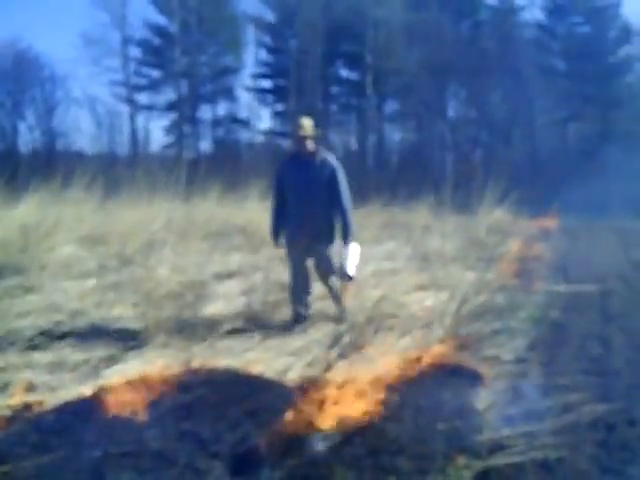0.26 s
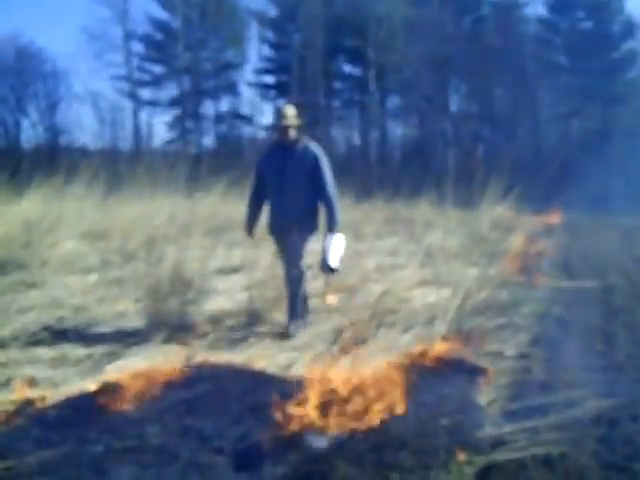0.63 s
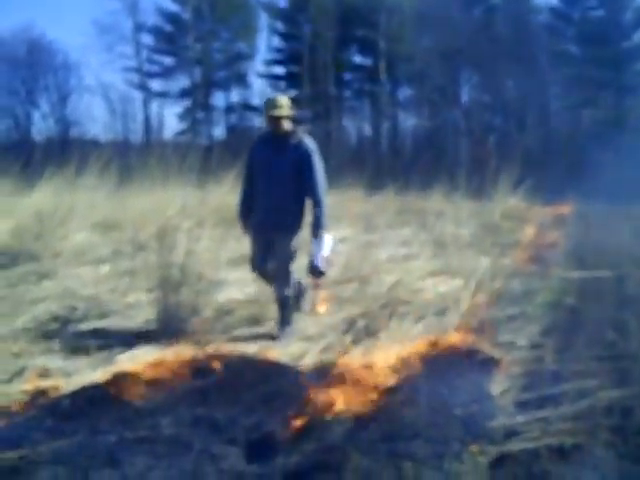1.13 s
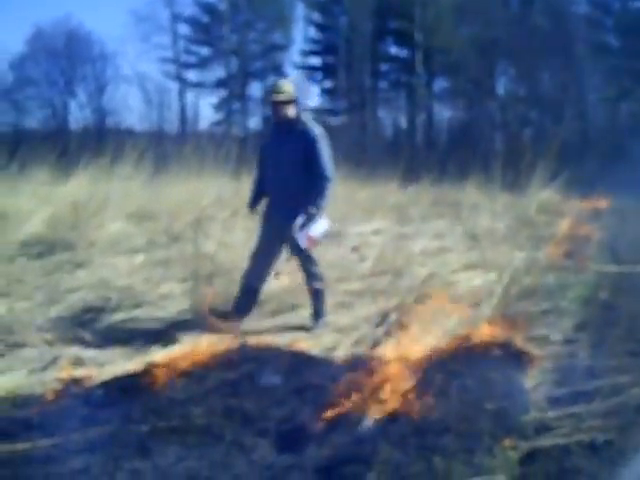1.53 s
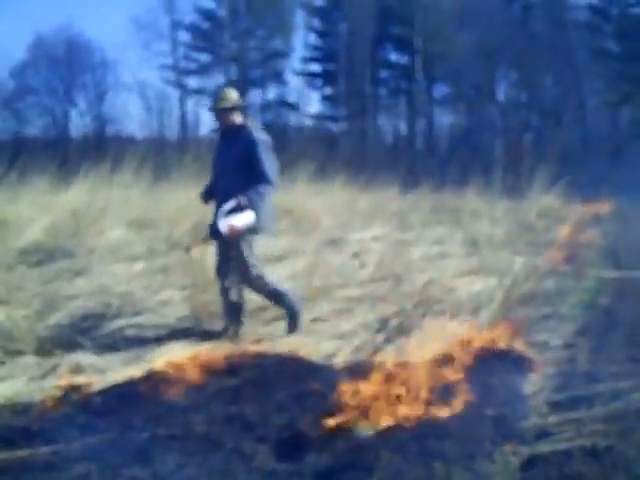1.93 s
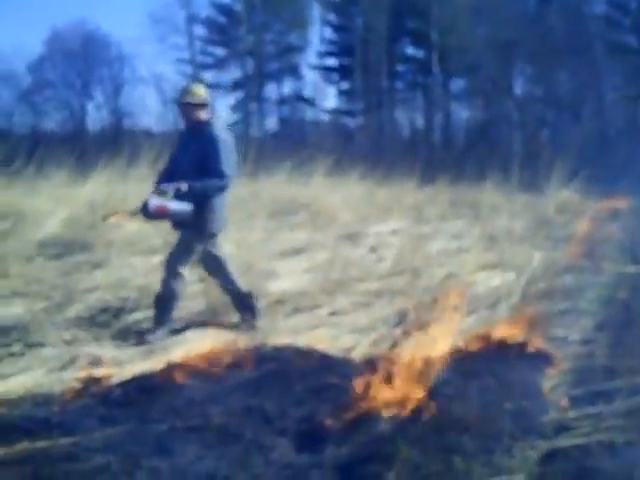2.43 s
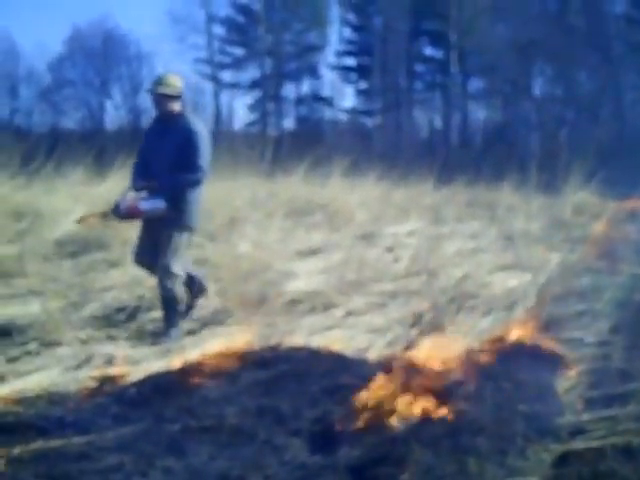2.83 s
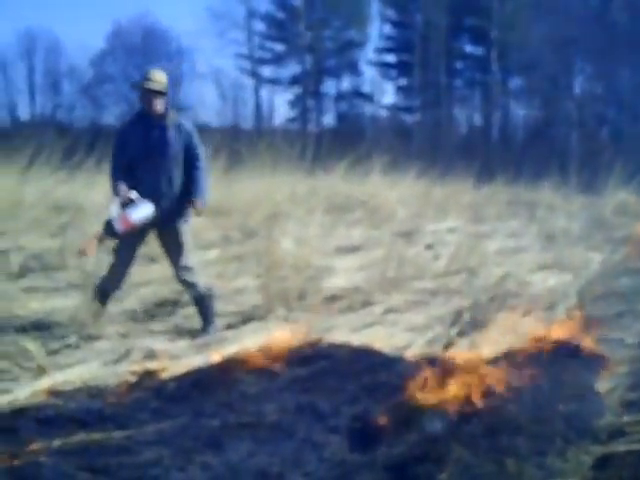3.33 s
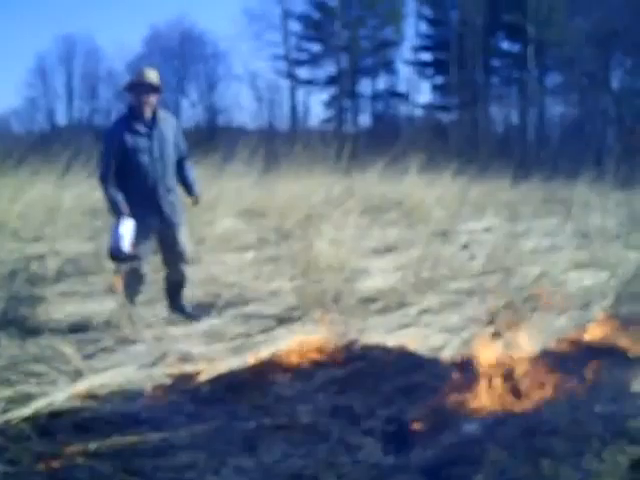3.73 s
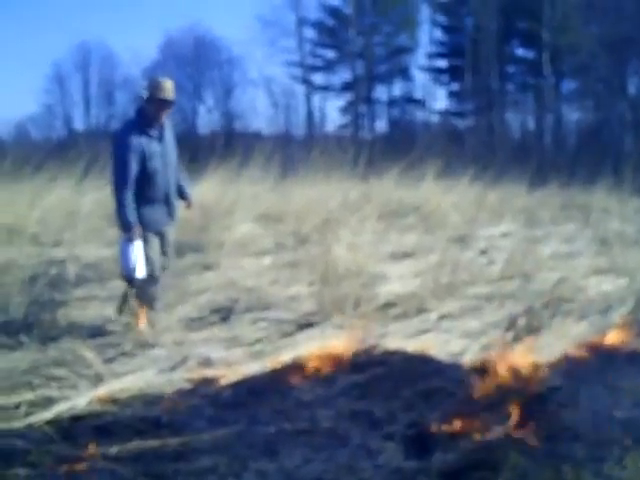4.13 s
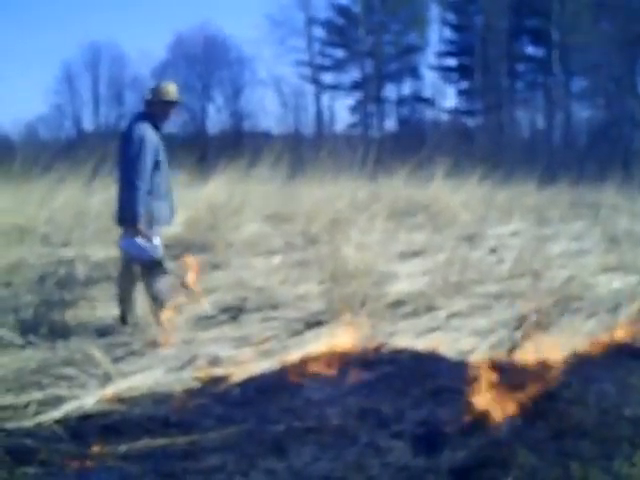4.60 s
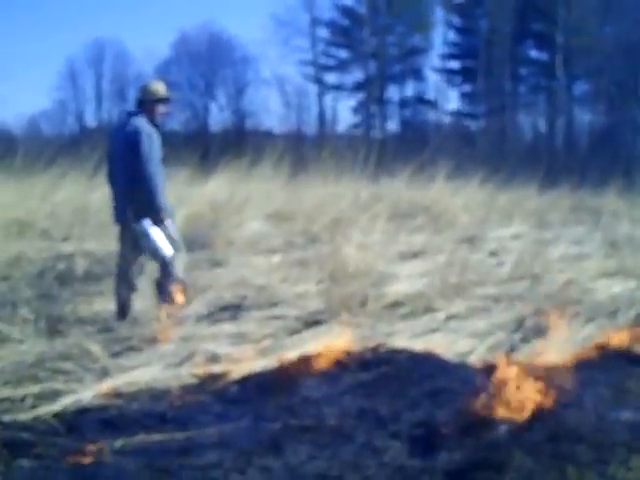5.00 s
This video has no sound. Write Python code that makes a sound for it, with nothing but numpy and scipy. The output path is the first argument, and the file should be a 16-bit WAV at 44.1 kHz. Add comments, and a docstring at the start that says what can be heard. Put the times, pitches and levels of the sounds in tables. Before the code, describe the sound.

Outdoors in an open field, dry grass burns a few steps from a small mono microphone. From 0 to 1 s there are scattered crisp snaps, one stronger near 0.4 s, over faint fizz, a soft flame rush and low breeze rumble. A tight cluster of crackles comes around 1 s. From about 1.2 to 3 s gusts buffet the microphone with deep rumble, fluttering and short dull thumps, strongest around 1.6-2.3 s; a brighter sizzle flares at about 1.7-2 s, and pops continue irregularly. After 3 s the wind drops and the crackling becomes much denser, with bright cracks carrying small hollow, woody knocks. Hard bursts land near 3.1, 3.75 and 4.3 s; the loudest, around 4.7 s, is sharp and slightly clipped. The flame rush swells gently near 4.8 s as light wind returns. Strong pops at 5.1, 5.2 and 5.5 s finish it. Only a very short scattered tail follows each snap.

```python
"""Stems of dry field grass burst in a fire a few steps away: snaps, hollow knocks and low puffs from noise showers.
Countless blades fizz as filtered hiss and sparse ticks, and the flames rush as unevenly swelling noise.
A gusty breeze buffets the microphone: slow and quick bands of noise, and single eddies of a few swings.
The microphone colours the sum, its loudest peaks overload at full scale, and the top treble is cut."""
import sys
import numpy as np
from scipy import signal
from scipy.fft import rfft, irfft
from scipy.io import wavfile

SR = 44100
rng = np.random.default_rng(int(sys.argv[2]) if len(sys.argv) > 2 else 0)


def file_out(sig):
    """Save sig as 16-bit WAV at sys.argv[1]."""
    # one column per channel
    cols = np.atleast_2d(sig).T
    # limit, then scale
    lim = np.clip(cols, -1, 1)
    pcm = np.round(lim * 32767).astype(np.int16)
    wavfile.write(sys.argv[1], SR, pcm)


N = 244755  # samples

# All levels stand ahead of the microphone's own colour; spectra are relative.
# Fizz of the burning grass, flaring up now and then, before its colour filter.
# Each row: time in seconds, hiss level in dB, level of the ticks of single blades in dB.
FIZZ_LEVELS = [(0.0, -52.5, -38.5), (0.3, -44.5, -54), (0.45, -59.5, -57.5), (0.8, -50, -53),
               (1.15, -59, -56), (1.55, -54, -50.5), (1.68, -45.5, -55), (1.82, -41, -47), (1.96, -45, -44),
               (2.08, -52, -54), (2.25, -49.5, -46.5), (2.4, -53.5, -54.5), (2.8, -58.5, -52.5),
               (3.2, -58.5, -46), (4.1, -55.5, -53), (4.85, -52.5, -48), (5.55, -59.5, -49.5)]
# Spectrum of the fizz. Each row: frequency in Hz, density in dB per Hz.
FIZZ_SPECTRUM = [(400, -13), (1500, 2), (13000, -2)]
# Rush of the flames. Each row: time in seconds, level in dB.
RUSH_LEVELS = [(0.0, -49.5), (0.33, -58), (0.7, -53.5), (2.0, -55.5), (2.3, -51.5), (4.3, -50), (4.8, -47),
               (5.55, -55)]
# Spectrum of the rush. Each row: frequency in Hz, density in dB per Hz.
RUSH_SPECTRUM = [(250, -27.5), (500, 5), (1050, -3), (1300, -6), (2800, -14), (6000, -44)]
# Slow buffeting of the changing breeze on the microphone, swelling and lulling.
# Each row: time in seconds, level in dB.
BREEZE_LEVELS = [(0.0, -36.5), (0.3, -42), (0.95, -42), (1.2, -31.5), (1.8, -31), (2.03, -29),
                 (2.14, -33.5), (2.25, -30), (2.45, -31.5), (2.6, -34.5), (2.85, -34.5), (3.3, -39.5),
                 (3.8, -37.5), (4.4, -41.5), (4.75, -34.5), (5.4, -33.5), (5.55, -39)]
# Spectrum of the slow eddies. Each row: frequency in Hz, density in dB per Hz.
BUFFET_SPECTRUM = [(10, 1), (25, -0.5), (60, -1), (100, -2), (150, -8.5), (300, -50), (1000, -89)]
# Quick eddies between gusts. Each row: time in seconds, flutter level in dB.
CALM_FLUTTER_LEVELS = [(0.0, -48), (1.1, -49), (3.2, -42), (5.55, -48)]
# Spectrum of the quick eddies. Each row: frequency in Hz, density in dB per Hz.
FLUTTER_SPECTRUM = [(60, -18.5), (120, 2), (200, 3.5), (330, -5.5), (550, -20.5), (900, -27), (4000, -48.5)]
# Bursting stems. Each row: start in seconds, snap level in dB, level of the hollow knock over the snap
# in dB, pitch of the knock in Hz, time scale of the split in ms.
BURSTING_STEMS = [(0.0286, -25.5, -1.5, 1440, 0.65), (0.047, -34.5, -4, 1600, 1.3),
                  (0.0699, -36, 2, 1000, 0.35), (0.1057, -21.5, -3, 1740, 1),
                  (0.2007, -29.5, -0.7, 1350, 0.98), (0.3082, -36, -1, 1410, 2.7),
                  (0.3648, -35, -6, 1210, 1.7), (0.377, -34, -7, 2300, 1.25), (0.432, -15, -3, 1730, 0.52),
                  (0.751, -33.5, -5.5, 1830, 1.3), (0.826, -29.5, -13, 1350, 1.4),
                  (0.8338, -18.5, -7, 1570, 0.81), (0.855, -36, 1, 1620, 2), (0.9089, -38, -3.5, 1020, 1.9),
                  (0.9792, -34.5, 2.5, 850, 0.48), (1.0053, -21, -7.5, 1210, 0.91),
                  (1.0197, -20.5, -3, 1950, 0.59), (1.0397, -21.5, -4.5, 2290, 0.55),
                  (1.0602, -25, -7.5, 1610, 1.3), (1.089, -34, -8, 2340, 1.7),
                  (1.1117, -35.5, 5.5, 3300, 0.61), (1.137, -46, 7, 1430, 1.2), (1.146, -33, -9, 1140, 1.1),
                  (1.288, -36.5, 6.5, 1170, 1.2), (1.3141, -23, -3, 1960, 0.75),
                  (1.3237, -21, -5.5, 2460, 0.53), (1.4833, -29, -4.5, 1320, 0.92),
                  (1.5907, -24, -8.5, 1950, 1.2), (1.6092, -18, -7, 1900, 1.46),
                  (1.7901, -21.5, -2.5, 2030, 1.4), (1.828, -32.5, 7.5, 2310, 1),
                  (1.8776, -18, -1, 2540, 0.67), (1.9057, -28.5, 1, 1340, 1.2),
                  (2.0136, -32.5, 0, 1400, 0.7), (2.0626, -28, -6, 1460, 0.98),
                  (2.2415, -32, -4, 800, 0.42), (2.2497, -18.5, -9.5, 1820, 1),
                  (2.4102, -27.5, -9, 1640, 1.4), (2.4231, -32.5, 8, 2640, 1.1),
                  (2.4397, -39, -6, 1430, 2.4), (2.454, -31, -9, 1440, 1.6),
                  (2.4651, -29.5, -0.5, 2660, 1.8), (2.5614, -35, -27, 1340, 0.49),
                  (2.592, -14.5, -4.5, 1610, 1), (2.6083, -30, -23, 1290, 0.43),
                  (2.616, -21, -4, 1810, 1.7), (2.7228, -37.5, -5, 1350, 1.3),
                  (2.7829, -21, 2.5, 1060, 1.1), (2.8, -36, 1, 1060, 2.4), (2.8591, -18, -9, 1260, 1.3),
                  (2.9573, -35, -9, 680, 0.71), (2.994, -43, 1, 1130, 1.1), (3.0844, -28, -8.5, 1070, 0.69),
                  (3.0994, -12, -5.5, 1870, 0.53), (3.1819, -17, -7, 1490, 0.76),
                  (3.2145, -19, -3.5, 2390, 1.6), (3.2393, -26.5, -0.5, 1560, 0.95),
                  (3.2756, -26, -2.5, 1980, 1), (3.2966, -18, -8, 2750, 1.1),
                  (3.3126, -25.5, 2, 2080, 0.87), (3.341, -43, 4, 1370, 0.95),
                  (3.3671, -14, -6.5, 1500, 0.87), (3.3791, -36, 6.5, 2120, 0.93),
                  (3.4849, -22, 2, 2920, 0.52), (3.493, -34.5, 1.5, 1210, 1.1),
                  (3.499, -34, -4.3, 1040, 1.2), (3.5274, -29, -1.5, 970, 1.3),
                  (3.5542, -29, -1.5, 1410, 0.86), (3.61, -30.5, -3, 1000, 1.5),
                  (3.6584, -30.5, -7.5, 1730, 1.3), (3.68, -37.5, 2, 1110, 1.3),
                  (3.703, -37, -16.4, 1080, 0.92), (3.7132, -20.5, 1.5, 1500, 0.92),
                  (3.738, -29, -5, 1640, 1.1), (3.7481, -12.5, -4, 2400, 1.04),
                  (3.7956, -20.5, -2, 2640, 0.86), (3.8054, -25.5, -5, 3040, 1.08),
                  (3.819, -45, 5, 920, 1.2), (3.903, -25.5, 4.5, 1580, 0.76),
                  (3.9439, -28.5, 0.5, 1930, 0.92), (3.9627, -26, -4, 1130, 0.83),
                  (3.9894, -32, -8, 1210, 0.68), (3.9994, -24, -7.5, 1400, 0.89),
                  (4.008, -14, -1, 3200, 0.65), (4.0983, -15.5, -4, 1000, 0.65),
                  (4.1408, -27, 0.5, 1050, 0.98), (4.1466, -31, 1, 1760, 0.92),
                  (4.1756, -25.5, -7.5, 1130, 0.94), (4.2234, -29, 0, 1010, 1.3),
                  (4.2619, -22, -6.5, 1810, 1), (4.268, -15.5, -5, 2040, 0.78),
                  (4.2769, -10, -5.5, 1960, 1.2), (4.3005, -15, -3.5, 2080, 0.76),
                  (4.3198, -30, -4, 1050, 0.89), (4.3283, -23.5, -0.5, 1950, 1.5),
                  (4.3662, -20, -4.5, 1330, 1.04), (4.3876, -33, -4, 1270, 1.9),
                  (4.4072, -22.5, -7.5, 905, 0.54), (4.4267, -26, -7, 930, 1.5),
                  (4.4347, -29.5, 0.5, 1020, 0.81), (4.4842, -27.5, -3.5, 1070, 2),
                  (4.5182, -27.5, -5, 1740, 1.1), (4.5292, -30, 0, 1310, 0.93),
                  (4.5394, -17.5, -7, 1310, 0.7), (4.59, -31.5, -4, 905, 0.61), (4.605, -34, -1, 855, 0.59),
                  (4.623, -19, -7, 1290, 1.2), (4.6732, -16.5, -7, 1880, 0.92),
                  (4.6974, -11.5, -4, 2250, 0.95), (4.7081, -14, -6, 1660, 0.62),
                  (4.717, -4.5, -5, 2120, 0.92), (4.7641, -32, -7, 1200, 1.3),
                  (4.8017, -31, 1.5, 1740, 0.47), (4.8196, -12.5, -7, 1880, 0.73),
                  (4.8536, -35.5, -4, 730, 2.3), (4.9017, -23.6, -4, 1550, 1.1),
                  (4.9306, -24.5, -3, 1730, 0.76), (4.9407, -12, -7, 2190, 0.85),
                  (4.977, -33, -8, 1470, 0.96), (4.9873, -25, -4.5, 1690, 1.5), (5.0118, -35, 1, 1160, 1.5),
                  (5.017, -32.5, -1, 1660, 0.66), (5.043, -22, -9, 1100, 1.2), (5.06, -21, -3, 1140, 0.65),
                  (5.081, -9.5, 0.9, 2000, 0.8), (5.1029, -23.5, -4.5, 1800, 1.1),
                  (5.1155, -33, -4, 950, 1.3), (5.2097, -25.5, -2, 2710, 0.8),
                  (5.2281, -11.5, -2.5, 1820, 0.98), (5.2435, -11.5, -6, 1280, 1.2),
                  (5.303, -37, 0, 1430, 1.2), (5.3145, -30, -13, 1330, 0.94), (5.339, -31.5, -1, 1280, 1.2),
                  (5.3885, -29.5, 0.5, 1320, 1.3), (5.4685, -33.5, 0.5, 1800, 1),
                  (5.511, -8, -7.5, 1520, 1.26)]
# Gusts that set the quicker eddies fluttering, on top of the calm flutter.
# Each row: start in seconds, length in seconds, peak flutter level in dB.
GUST_ARCHES = [(1.193, 0.31, -37.5), (1.525, 0.63, -28), (2.213, 0.18, -27), (2.38, 0.16, -35.5),
               (2.59, 0.26, -38.5), (2.796, 0.19, -31.5), (2.923, 0.21, -34.5), (4.744, 0.36, -42.5),
               (5.3, 0.2, -43.5)]
GUST_SKEW = 0.8  # exponent; under 1 a gust swells faster than it dies
# Single eddies that thump the membrane. Each row: centre in seconds, level in dB, pitch in Hz.
EDDY_THUMPS = [(1.216, -27, 217), (1.248, -24, 168), (1.335, -40, 193), (1.421, -26.5, 160),
               (1.675, -23, 212), (1.846, -33, 182), (1.93, -23, 197), (2.227, -26, 230), (2.258, -34, 204),
               (2.294, -35, 190), (2.421, -23.5, 148), (2.541, -23.5, 175), (2.668, -20, 214),
               (2.866, -32, 234), (2.971, -21, 262), (3.057, -32, 172), (4.43, -23, 267),
               (5.247, -29.5, 288), (5.392, -37, 183), (5.515, -22, 264)]
# Response of the microphone, ringing in its small port. Each row: frequency in Hz, gain in dB.
MICROPHONE_RESPONSE = [(1000, 2.5), (1500, -3.5), (2300, 0), (3000, -0.5), (5200, 1), (6200, 4.5),
                       (8000, 6.5), (9800, 3), (11000, -4), (12600, -12.5), (14000, -35)]
EDGE_HZ = 13470  # upper band limit


def gain_of(db):
    """Level law: twenty decibels are a factor of ten in amplitude."""
    return 10 ** (np.asarray(db) / 20)


def evened(x):
    """Normalisation to unit rms."""
    return x / np.sqrt(np.mean(x ** 2) + 1e-20)


def read(points, hz):
    """Interpolation of a spectrum along logarithmic frequency."""
    f, value = np.transpose(points)
    return np.interp(np.log(hz + 1), np.log(f + 1), value)


def curve(rows):
    """Linear interpolation in time: each column of a table, one value a sample."""
    s, *columns = np.transpose(rows)
    return [np.interp(np.arange(N) / SR, s, column) for column in columns]


def colour(x, points):
    """Minimum-phase filtering: the log gain fixes the phase of a causal filter."""
    log_gain = np.log(gain_of(read(points, abs(np.fft.fftfreq(4096, 1 / SR)))))
    response = np.exp(np.conj(signal.hilbert(log_gain)))
    taps = np.fft.ifft(response).real[:2048]
    return signal.oaconvolve(x, taps)[:len(x)]


def wander(hz):
    """Low-passed chance of unit rms, its spectrum falling to half amplitude at hz."""
    f = np.fft.rfftfreq(N, 1 / SR)
    spectrum = rfft(rng.standard_normal(N)) / (1 + (f / hz) ** 2)
    return evened(irfft(spectrum, N))


def fizz(per_s=150, spread_db=5.0, flicker_db=1.0):
    """Superposition of many sources: far blades merge into hiss, nearer ones tick, a few of them large."""
    hiss_db, ticks_db = curve(FIZZ_LEVELS)
    sizes = gain_of(spread_db * np.minimum(rng.exponential(1, N), 3))
    onsets = sizes * (rng.random(N) < per_s / SR)
    t = np.arange(300) / SR
    decay = np.exp(-t / 0.0012)
    ticks = signal.oaconvolve(onsets, decay)[:N] * rng.standard_normal(N)
    hiss = rng.standard_normal(N) * gain_of(flicker_db * wander(30))
    mix = gain_of(hiss_db) * evened(hiss) + gain_of(ticks_db) * evened(ticks)
    return colour(mix, FIZZ_SPECTRUM)


def rush(lick_db=0.8):
    """Turbulent combustion noise: flames tear and flap unevenly."""
    noise = colour(rng.standard_normal(N), RUSH_SPECTRUM) * gain_of(lick_db * wander(25))
    return gain_of(curve(RUSH_LEVELS)[0]) * evened(noise)


def wind(lumps_db=2.6, flaps_db=2.0):
    """Turbulent pressure: slow eddies push the membrane, and quicker ones arrive in lumps."""
    slow = colour(rng.standard_normal(N), BUFFET_SPECTRUM) * gain_of(lumps_db * wander(29))
    quick = colour(rng.standard_normal(N), FLUTTER_SPECTRUM) * gain_of(flaps_db * wander(53))
    breeze = gain_of(curve(BREEZE_LEVELS)[0])
    flutter = gain_of(curve(CALM_FLUTTER_LEVELS)[0]) + gusts()
    return breeze * evened(slow) + flutter * evened(quick)


def band(x, low_hz, high_hz):
    """First-order band-pass resonance."""
    return signal.sosfilt(signal.butter(1, [low_hz, high_hz], "band", fs=SR, output="sos"), x)


def pop(snap_db, knock_db, hz, split_ms, chance, first=0.59, grit_db=6.0, width=1.0, stretch=2.67, thud=0.24):
    """Fracture: a crack and a dying shower of fibre snaps, bright in the open, duller through the hollow stem."""
    t = np.arange(chance.shape[1]) / SR
    grit = chance[0] * gain_of(grit_db * chance[1])
    shower = grit * np.exp(-1000 * t / (stretch * split_ms)) * np.tanh(t / 0.00019)
    shower[8] = first / split_ms * np.linalg.norm(shower)  # a quick split is mostly its first crack
    snap = signal.sosfilt(signal.butter(2, 4300, "high", fs=SR, output="sos"), shower)
    knock = band(shower, hz / (1 + width), hz * (1 + width))
    push = band(shower, 180, 800)  # the puff of steam
    knock = knock / np.linalg.norm(knock) + thud * push / np.linalg.norm(push)
    energy = np.sqrt(0.005 * SR)  # levels are rms over five milliseconds
    return energy * gain_of(snap_db) * (snap / np.linalg.norm(snap) + gain_of(knock_db) * knock)


def scattered(x, t60, db):
    """Diffuse scattering: stubble and ground throw back a short tail, thin in the bass (t60 in seconds)."""
    t = np.arange(round(0.12 * SR)) / SR
    tail = signal.lfilter([1, -0.8], 1, rng.standard_normal(len(t))) * gain_of(-60 * t / t60)
    return x + gain_of(db) * signal.oaconvolve(x, tail / np.linalg.norm(tail))[:len(x)]


def pops():
    """Impulsive radiation: every burst stem that stands out, with its scattered tail."""
    length = 800  # samples
    out = np.zeros(N + length)
    chance = rng.standard_normal((len(BURSTING_STEMS), 2, length))
    for (s, *shape), draws in zip(BURSTING_STEMS, chance):
        out[round(s * SR):][:length] += pop(*shape, draws)
    return scattered(out[:N], t60=0.07, db=-15)


def gusts():
    """Amplitude modulation by wind speed: each gust swells and dies in one arch."""
    t = np.arange(N) / SR
    total = np.zeros(N)
    for s, length, db in GUST_ARCHES:
        progress = np.clip((t - s) / length, 0, 1)
        total += gain_of(db) * np.sin(np.pi * progress ** GUST_SKEW) ** 2
    return total


def flaps(cycles=0.79):
    """Pressure pulse of a passing eddy: a lump of a few lopsided swings."""
    out, phases = np.zeros(N), 2 * np.pi * rng.random(len(EDDY_THUMPS))
    for (s, db, hz), phase in zip(EDDY_THUMPS, phases):
        start = round(s * SR) - 1500
        turns = hz * (np.arange(N)[start:][:3000] / SR - s)
        angle = 2 * np.pi * turns + phase
        swings = np.sin(angle + 0.42 * np.sin(angle))  # phase bending makes them lopsided
        lump = np.exp(-(turns / cycles) ** 2) * swings
        out[start:][:3000] += np.sqrt(2) * gain_of(db) * lump
    return out


def scene():
    """Linear superposition of fire and wind, in one channel."""
    return (fizz() + rush() + wind() + pops() + flaps())[None]


def record(dry):
    """Transduction: microphone colour, overload at full scale, then the band limit."""
    loud = np.clip(colour(dry[0], MICROPHONE_RESPONSE), -1, 1)
    low_pass = signal.firwin(255, EDGE_HZ, window=("kaiser", 9), fs=SR)
    return signal.oaconvolve(loud, low_pass, "same")[None]


dry = scene()
out = record(dry)
file_out(out)
```